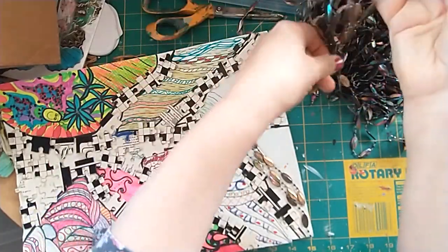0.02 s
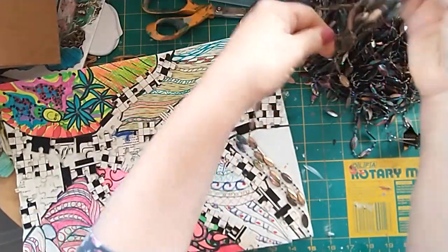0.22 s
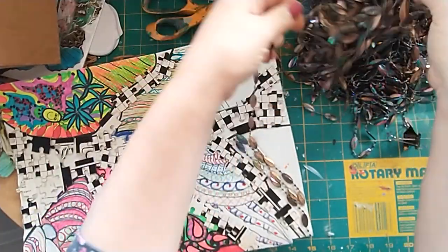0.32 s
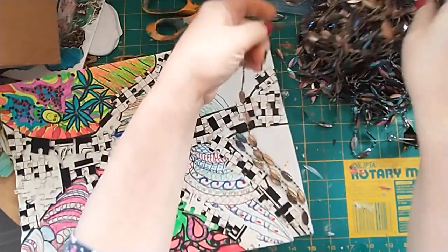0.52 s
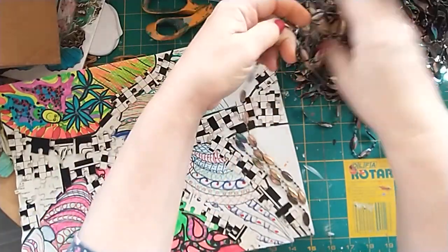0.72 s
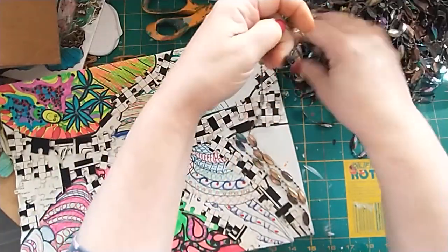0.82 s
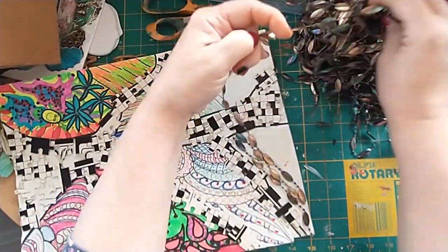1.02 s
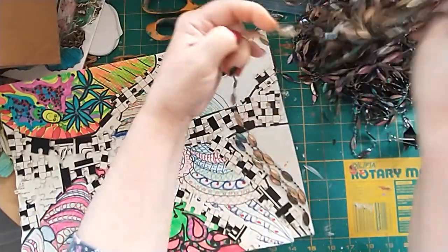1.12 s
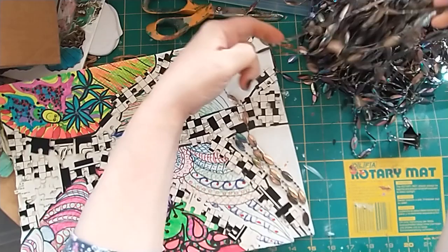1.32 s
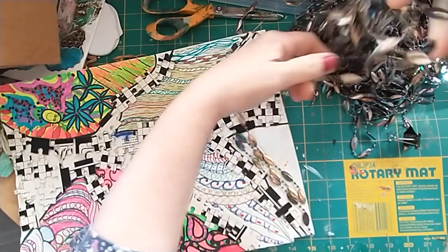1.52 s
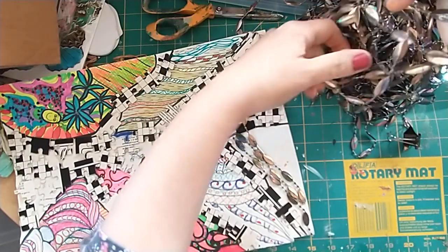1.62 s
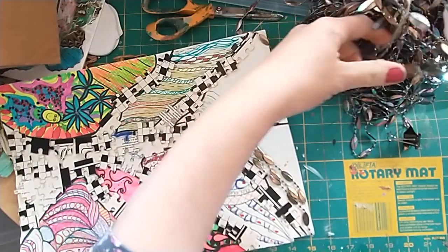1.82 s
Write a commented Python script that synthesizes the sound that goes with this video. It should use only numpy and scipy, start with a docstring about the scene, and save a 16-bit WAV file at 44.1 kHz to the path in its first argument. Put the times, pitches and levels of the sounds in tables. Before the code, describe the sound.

A heap of beaded strands rattles brightly as it is handled, starting faint, swelling strongest around the middle, then bigger beads knock and the rattle fades; close stereo pickup in a small, quiet, dry room.

```python
"""At a craft table in a small room, hands lift and turn a heap of beaded strands.
Thousands of short resonances make the rattle, swelling with each pull; looser beads ring on and slips hiss.
Hard clicks stand out, bigger beads knock on a bank of modes, and dragged strands patter on the hollow table.
A soft noise thud and a faint steady room sound lie underneath."""
import sys
import numpy as np
from scipy import signal
from scipy.fft import rfft, irfft, next_fast_len
from scipy.io import wavfile
from scipy.ndimage import uniform_filter1d

SR = 44100
rng = np.random.default_rng(int(sys.argv[2]) if len(sys.argv) > 2 else 0)


def materialize(psi):
    """Save the field psi as 16-bit PCM at rate SR to the path in sys.argv[1].

    A 1-D psi becomes a single channel; in a 2-D psi each row is a channel.
    """
    bounded = np.clip(np.atleast_2d(psi).T, -1, 1)
    quanta = np.round(bounded * 32767).astype(np.int16)
    wavfile.write(sys.argv[1], SR, quanta)


N = 81585
TIME = np.arange(N) / SR


def from_db(db):
    """Decibels to amplitude gain."""
    return 10 ** (np.asarray(db) / 20)


def rms_one(x):
    """Scale to unit rms."""
    return x / np.sqrt(np.mean(x ** 2) + 1e-20)


def in_time(rows):
    """Draw a breakpoint curve as a value at every sample."""
    return np.interp(TIME, *np.transpose(rows))


def colour(x, points):
    """Minimum-phase equaliser through (frequency, level) points, so nothing sounds ahead of its hit."""
    size = 2 * next_fast_len(N)
    hz, db = np.transpose(points)
    grid = np.maximum(np.arange(size // 2 + 1) * SR / size, 1)
    level_db = np.interp(np.log(grid), np.log(hz), db)
    cepstrum = irfft(np.log(from_db(level_db)))
    # folding the cepstrum onto positive time makes the filter causal
    cepstrum[1:size // 2] *= 2
    cepstrum[size // 2 + 1:] = 0
    return irfft(rfft(x, size) * np.exp(rfft(cepstrum)))[..., :N]


def band(x, low_hz, high_hz):
    """Butterworth band-pass."""
    edges_hz = [low_hz, min(high_hz, SR / 2 - 1000)]
    sos = signal.butter(2, edges_hz, "band", fs=SR, output="sos")
    return signal.sosfilt(sos, x + 1e-18)


def ring(hits, hz, t60):
    """Two-pole resonance: a unit hit starts a sine of about height 1 that falls 60 dB in t60 seconds."""
    radius = from_db(-60 / (t60 * SR))
    angle = 2 * np.pi * hz / SR
    return signal.lfilter([.5, 0, -.5], [1, -2 * radius * np.cos(angle), radius * radius], hits + 1e-18)


def strikes(s, gain):
    """Single impulses at given times."""
    out = np.zeros(N)
    samples = np.clip(np.asarray(s) * SR, 0, N - 1).astype(int)
    np.add.at(out, samples, gain)
    return out


def shower(per_s, spread_db):
    """Random impulses of either sign; a positive spread gives many small and few large."""
    excess = np.minimum(rng.exponential(1, N), 3.5)
    sizes = from_db(spread_db * excess) * rng.choice([-1, 1], N)
    return sizes * (rng.random(N) < per_s / SR)


def even(x, size):
    """Hold the power steady over `size` samples, keeping the finer grain."""
    power = np.mean(np.atleast_2d(x) ** 2, axis=0)
    return x / np.sqrt(uniform_filter1d(power, size) + 1e-12)


def place(x, pan_db, lag_s):
    """Stereo position: left-over-right level difference and a delay of the left side."""
    delayed = np.interp(TIME - round(lag_s * SR) / SR, TIME, x)
    return np.array([delayed * from_db(pan_db / 2), x * from_db(-pan_db / 2)])


def room(x, near_db, far_db):
    """Convolve with decaying noise: quick scatter from table and hands, then the room's short tail."""
    scatter_t60_s, room_t60_s, room_gap_s = .075, .083, .0026
    t = TIME[:SR // 2]
    near, far = rng.standard_normal((2, 2, len(t)))
    near = near * from_db(-60 * t / scatter_t60_s)
    far = far * from_db(-60 * t / room_t60_s) * (t > room_gap_s)
    # each part has an energy of 1 before its level is set
    response = (from_db(near_db) * rms_one(near) + from_db(far_db) * rms_one(far)) / np.sqrt(len(t))
    return x + signal.fftconvolve(x, response, axes=1)[:, :N]


def focus(hz, centre_hz, octaves):
    """A contact excites the modes near its centre most, along a bell curve in octaves."""
    return np.exp(-.5 * (np.log2(hz / centre_hz) / octaves) ** 2)


def still_room():
    """Faint steady background: coloured noise, with less of it differing between the sides than shared."""
    # spectrum of the background: (frequency [Hz], level [dB])
    hush_spectrum = [(25, 1), (38, -17), (50, 2), (70, -6), (100, 5.5), (130, 0), (250, -4.5), (500, -4.5),
                     (1000, 3.5), (3000, -10), (15000, -11)]
    floor_db, side_db = -70.5, -5
    mid, side = rng.standard_normal((2, N))
    hush = mid + from_db(side_db) * side * [[1], [-1]]
    return from_db(floor_db) * rms_one(colour(hush, hush_spectrum))


def clinks():
    """Loose beads ring a little longer, on 30 narrow resonances at separate pitches and places."""
    hits = shower(per_s=200, spread_db=-1.5)
    dealt = rng.integers(0, 30, N)
    beads = 0
    for k, hz in enumerate(np.linspace(8350, 11900, 30)):
        bead = ring(hits * (dealt == k), hz, t60=.018)
        beads = beads + place(bead, rng.normal(0, 1), rng.uniform(0, .0003))
    return even(beads, size=3000)


def rattle(stir_db):
    """Tiny collisions in clumps ring at varied pitches and places; stirring makes them denser and louder."""
    # tone of the rattle as heard on the left; the right is equalised further below:
    # (frequency [Hz], level [dB])
    bead_tone = [(600, -63), (1500, -22), (2400, -56.5), (2800, -21), (4900, -20.5), (5600, -15.5),
                 (6400, -8), (7400, -3), (8400, -2), (9700, 3.5), (11200, -1.5), (12500, -12), (14200, -5),
                 (15800, -17)]
    # further equaliser on the right side alone: (frequency [Hz], gain [dB])
    right_tone = [(2000, -2), (4800, 1.5), (6300, 4), (8800, -0.5), (10300, -0.5), (12300, 5), (15500, 0.5)]
    clumps_per_s, clump_decay_s, clump_depth = 170, .0035, .2
    hits_per_s, rate_follows = 5000, .78  # rate before clumping, at mean stirring; share of the dB swing
    bead_t60_s, wash_t60_s = .0028, .07
    pan_step_db, wash_db, clink_db, rattle_db = 4, -3.5, -7.5, 2.5

    # a strand falls against others: a short burst of collisions
    falls = rng.exponential(1, N) * (rng.random(N) < clumps_per_s / SR)
    bursts = signal.lfilter([1], [1, -np.exp(-1 / (clump_decay_s * SR))], falls)
    clumps = np.sqrt(.3 + clump_depth * bursts)
    density = clumps * from_db(rate_follows * (stir_db - stir_db.mean()))
    hits = clumps * shower(hits_per_s * density, spread_db=2.5)

    # every hit is dealt two pitches
    pitches = np.linspace(1000, 17000, 48)
    dealt = rng.integers(0, len(pitches), (2, N))
    beads = 0
    for k, hz in enumerate(pitches):
        bead = ring(hits * (dealt == k).sum(axis=0), hz, bead_t60_s)
        beads = beads + place(bead, pan_step_db * (k % 3 - 1), rng.uniform(0, .0003))

    # reflections of all the collisions, merged into noise; -120 because this decay acts on power
    fade = from_db(-120 / (wash_t60_s * SR))
    wash_power = signal.lfilter([1], [1, -fade], hits ** 2)
    wash = np.sqrt(wash_power + 1e-12) * rng.standard_normal((2, N))

    mixed = rms_one(beads) + from_db(wash_db) * rms_one(wash)
    heap = even(colour(mixed, bead_tone), size=900)
    left, right = heap + from_db(clink_db) * clinks()
    stereo = np.array([left, colour(right, right_tone)])
    return from_db(rattle_db + stir_db) * rms_one(stereo)


def sliding(stir_db):
    """Small slips between beads, lower in pitch than the rattle and less tied to the stirring."""
    # tone of beads sliding along one another: (frequency [Hz], level [dB])
    slip_tone = [(1200, -24.5), (2500, -7), (3500, -2.5), (4600, -0.5), (5600, -3), (8000, -8),
                 (15000, -27)]
    slide_db, slide_follows = -59.5, .32  # level at mean stirring; share of its dB swing
    grains = shower(per_s=1200, spread_db=.5) * rng.standard_normal((2, N))
    slips = rms_one(grains) + .5 * rng.standard_normal((2, N))
    level = from_db(slide_db + slide_follows * (stir_db - stir_db.mean()))
    return level * even(colour(slips, slip_tone), size=1500) * from_db([[-1], [1]])  # right is louder


def table():
    """Dragged strands patter and tap: impulses excite the hollow table's closely spaced modes."""
    # light patter, before its trim: (time [s], level [dB])
    patter_curve = [(0.0, -72), (0.086, -81), (0.2, -55.5), (0.37, -71.5), (0.39, -62.5), (0.778, -69.5),
                    (0.824, -59.5), (0.958, -67), (1.004, -55), (1.06, -70.5), (1.23, -59.5), (1.262, -68),
                    (1.396, -60.5), (1.648, -71), (1.71, -53), (1.756, -79), (1.802, -66.5), (1.85, -85)]
    # heavier taps, before their trim: (time [s], level [dB])
    tap_list = [(.196, -81), (1.113, -52), (1.187, -57.5), (1.212, -47), (1.473, -41), (1.603, -48.5),
                (1.691, -45), (1.7055, -42)]
    # the table's hollow note: (frequency [Hz], level [dB], t60 [s])
    hollow_modes = [(860, 0, .022), (940, -3, .018), (1020, -2, .022)]
    patter_trim_db, tap_trim_db = -1.5, -2

    def hollow(hits):
        """Sum the ringing table modes and keep their narrow band."""
        note = sum(from_db(db) * ring(hits, hz, t60) for hz, db, t60 in hollow_modes)
        return band(note, 852, 985)

    tap_s, tap_db = np.transpose(tap_list)
    patter = even(hollow(shower(per_s=400, spread_db=4.5)), size=2000)
    taps = hollow(strikes(tap_s, from_db(tap_db + tap_trim_db)))
    patter_level = from_db(in_time(patter_curve) + patter_trim_db)
    return place(taps + patter_level * patter, pan_db=-.5, lag_s=.00021)


def knocks():
    """Bigger beads knock and tumble on a bank of modes; each blow strikes each mode with a new strength."""
    # knocks, before their trim: (time [s], level [dB], centre of ringing [Hz], width of ringing [octaves])
    knock_list = [(0.198, -43, 1430, 1.9), (.338, -36.5, 3700, 0.18), (0.391, -37.5, 2280, 1.2),
                  (.402, -36.5, 2420, 1.4), (.409, -46, 2150, 0.69), (.417, -48, 2420, 0.71),
                  (0.501, -43.5, 1800, 1.5), (0.918, -42.5, 2350, 1.1), (0.926, -47, 2000, 1.8),
                  (1.088, -43, 2000, 0.77), (1.213, -43.5, 1800, 2.1), (1.225, -36.5, 2180, 2.1),
                  (1.366, -44, 2200, 1.5), (1.379, -35, 1950, 0.63), (1.399, -28, 2020, 0.37),
                  (1.4031, -32.5, 2160, 1.3), (1.4072, -24.5, 1830, 0.71), (1.411, -38, 1890, 1.6),
                  (1.416, -40, 2000, 0.72), (1.426, -47, 2320, .7), (1.471, -38, 1700, 0.46),
                  (1.480, -34.5, 1960, 0.13), (1.538, -31, 1945, 0.24), (1.6526, -28, 1880, 0.27),
                  (1.653, -26.5, 4840, 0.22), (1.659, -36, 2650, 0.38), (1.669, -43.5, 2490, 2),
                  (1.682, -38.5, 2170, 0.22), (1.69, -40.5, 3450, 2.3)]
    # what a knock rings with: (frequency [Hz], level [dB], t60 [s])
    bead_modes = [(363, -15, 0.072), (636, -17, 0.039), (887, -15, 0.12), (1256, -9, 0.036),
                  (1514, -7, 0.0092), (1754, -9, 0.022), (1968, -10.5, 0.029), (2253, -6.5, 0.017),
                  (2468, -4.5, 0.017), (2740, -5.5, 0.023), (3320, -1.5, 0.0088), (3700, -4.5, 0.014),
                  (4350, 6.5, 0.0033), (5250, -10, 0.02)]
    # light knocking inside the heap: (time [s], level [dB])
    tumble_curve = [(0, -96), (.09, -79), (.17, -67), (.36, -65.5), (.52, -62), (.71, -63), (.77, -70),
                    (1.0, -66), (1.12, -64.5), (1.26, -67.5), (1.33, -56), (1.45, -61.5), (1.63, -69),
                    (1.7, -62.5), (1.8, -66), (1.85, -78)]
    knock_trim_db, crack_db, strike_spread_db = -2.5, -2, 2
    tumble_hz, tumble_octaves = 1750, .4

    s, db, centre_hz, octaves = np.transpose(knock_list)
    tumbles = shower(per_s=1500, spread_db=2.5)
    # the wider the ringing, the stronger the crack
    blows = from_db(crack_db) * band(strikes(s, octaves * from_db(db)), 1000, 5500)
    tumbling = 0
    for k, (hz, mode_db, t60) in enumerate(bead_modes):
        varied_db = db + mode_db + rng.normal(0, strike_spread_db, len(s))
        strength = from_db(varied_db) * focus(hz, centre_hz, octaves)
        blows = blows + (-1) ** k * ring(strikes(s, strength), hz, t60)
        # tumbling rings about half as long
        light = ring(tumbles * rng.standard_normal(N), hz, t60 * .48)
        tumbling = tumbling + from_db(mode_db) * focus(hz, tumble_hz, tumble_octaves) * light

    blows = from_db(knock_trim_db) * band(blows, 516, 8000)
    tumbling = from_db(in_time(tumble_curve)) * even(band(tumbling, 1730, 9000), size=2500)
    return room(place(blows + tumbling, pan_db=-2, lag_s=.00009), near_db=-9.5, far_db=-6)


def hard_clicks():
    """Bead on bead: a snap and a brief ring, with one quick rebound."""
    # hard clicks: (time [s], level [dB], pitch [Hz], left over right [dB])
    click_list = [(.1785, -31, 9200, -2), (.2228, -26, 9850, -3), (.2435, -27, 11300, -2),
                  (.2852, -27, 10500, -2), (.302, -28, 11000, -2), (.3124, -23, 10250, -3),
                  (.3626, -29, 10600, 0), (.3786, -31, 10700, -2), (.4346, -24, 9300, -2),
                  (.4588, -26, 9500, -2), (.4684, -27, 10500, -2), (.5015, -27, 11400, 0),
                  (.725, -25, 9600, -1), (.7521, -19, 8870, -3), (.7888, -14, 12200, -5),
                  (.934, -22, 9950, -1), (.9507, -11, 9900, -3), (.9708, -15, 8500, -1),
                  (.9712, -11, 11280, -1), (.9861, -18, 11100, -1), (1.1008, -11, 11800, -6),
                  (1.1925, -21, 10500, -1), (1.218, -23, 11200, -4), (1.2409, -22, 7600, -5),
                  (1.277, -22, 8870, -9), (1.3173, -18, 10900, -8), (1.4121, -18, 10500, -2),
                  (1.4686, -20, 7900, -2), (1.574, -26, 11400, -1), (1.652, -25, 10300, 1),
                  (1.691, -30, 8000, 0), (1.7357, -26, 9560, -7), (1.7731, -24, 11000, 1)]
    click_t60_s, snap, rebound_s, rebound_db = .0022, .7, .0005, -5
    chances = rng.random((len(click_list), 2))
    out = 0
    for (s, db, hz, pan_db), (late, lag) in zip(click_list, chances):
        # the rebound comes after 0.5 to 1.5 times rebound_s
        hit = strikes([s, s + rebound_s * (.5 + late)], from_db([db, db + rebound_db]))
        click = ring(hit, hz, click_t60_s) + snap * hit
        out = out + place(click, pan_db, lag * .0001)
    return room(band(out, 6500, 16500), near_db=-4, far_db=-13)


def bump():
    """Soft bump of the heap on the table: a dull, quickly dying thud of low noise."""
    bump_s, bump_db, bump_t60_s = .970, -68.5, .14
    since = np.maximum(TIME - bump_s, 0)
    level = from_db(bump_db - 60 * since / bump_t60_s) * (since > 0)
    return level * rms_one(band(rng.standard_normal(N), 60, 520))


def scene():
    """Beads, table and room together, with one stirring curve behind rattle and sliding."""
    # how hard the heap is stirred, as level of the rattle before its trim: (time [s], level [dB])
    stir_curve = [(0.0, -54.5), (0.06, -67), (0.206, -38.5), (0.314, -42), (0.344, -51), (0.426, -43),
                  (0.438, -36.5), (0.582, -47.5), (0.602, -53.5), (0.704, -40.5), (0.756, -31),
                  (0.808, -30.5), (0.824, -33.5), (0.916, -40), (0.952, -29.5), (1.092, -36.5),
                  (1.102, -34.5), (1.112, -34), (1.184, -36.5), (1.194, -32), (1.204, -40), (1.226, -35),
                  (1.252, -42), (1.328, -31.5), (1.452, -40), (1.468, -38), (1.534, -44.5), (1.582, -39),
                  (1.642, -49.5), (1.654, -42), (1.668, -44.5), (1.762, -47.5), (1.772, -46.5),
                  (1.798, -56.5), (1.812, -51), (1.85, -56)]
    stir_db = in_time(stir_curve)
    beads = rattle(stir_db) + sliding(stir_db) + hard_clicks() + knocks()
    return beads + table() + bump() + still_room()


def record(dry):
    """Cut the top steeply with an elliptic low-pass."""
    sos = signal.ellip(12, .1, 80, 15850, fs=SR, output="sos")  # ripple and stopband [dB], cutoff [Hz]
    return signal.sosfilt(sos, dry)


dry = scene()
out = record(dry)
materialize(out)
```